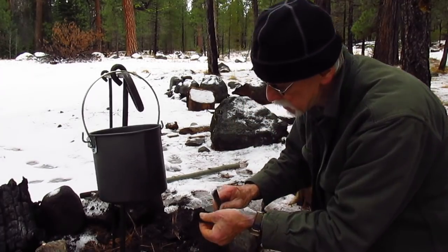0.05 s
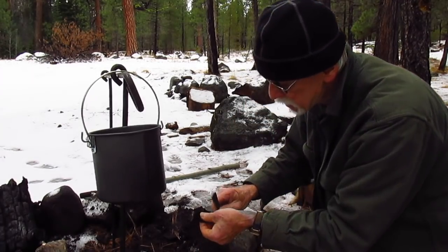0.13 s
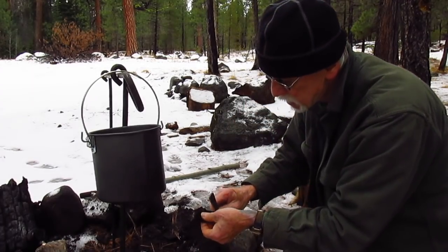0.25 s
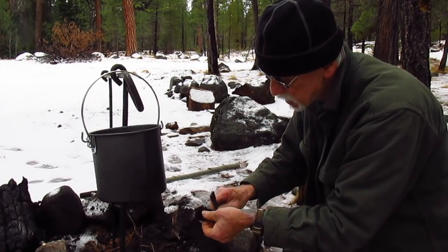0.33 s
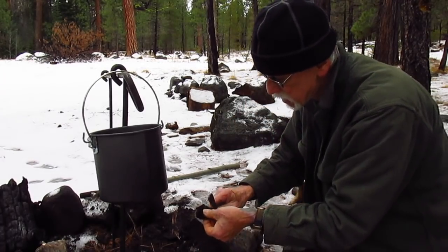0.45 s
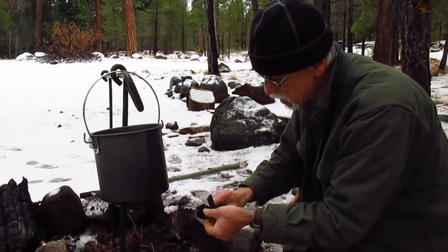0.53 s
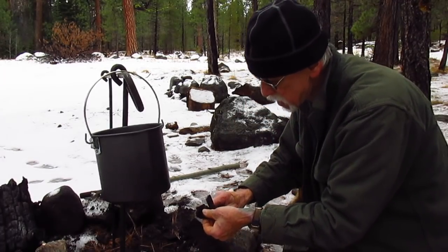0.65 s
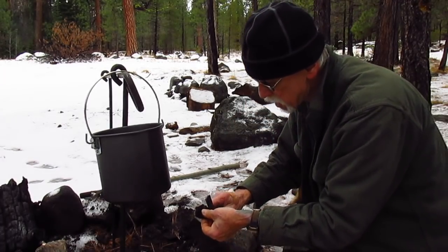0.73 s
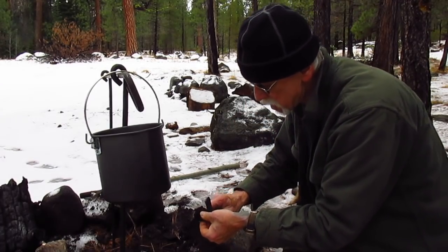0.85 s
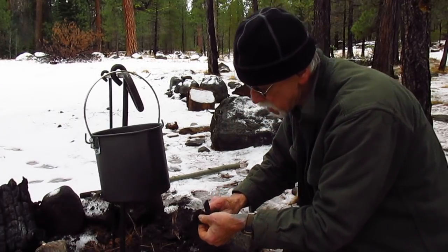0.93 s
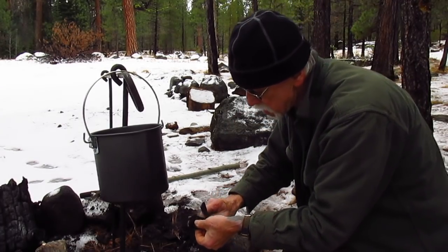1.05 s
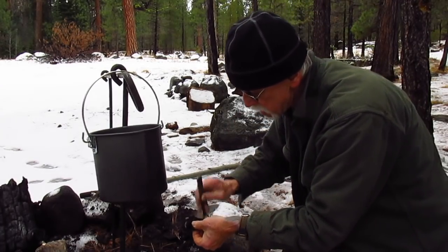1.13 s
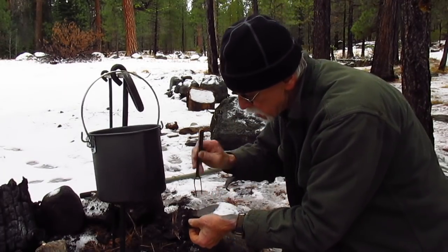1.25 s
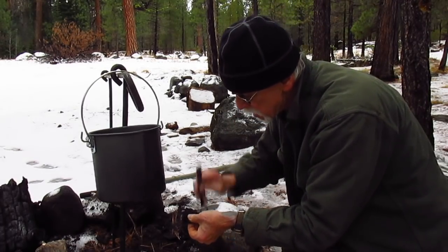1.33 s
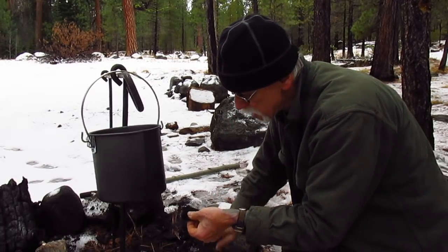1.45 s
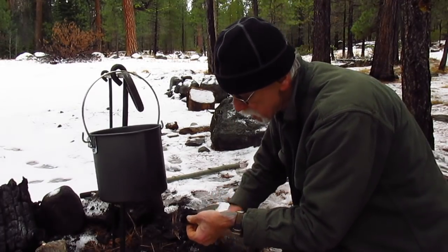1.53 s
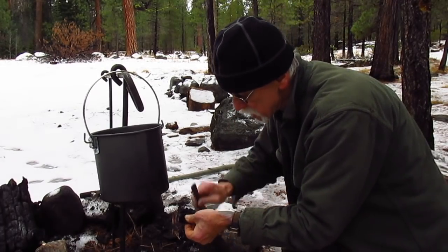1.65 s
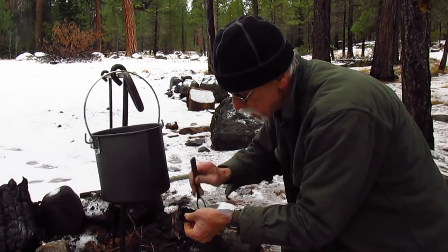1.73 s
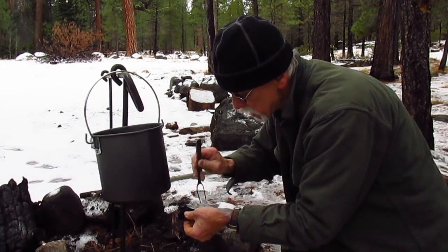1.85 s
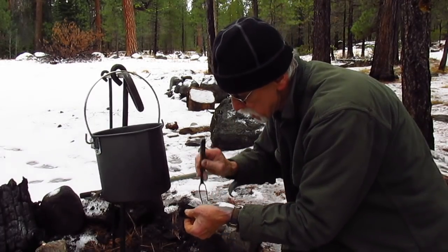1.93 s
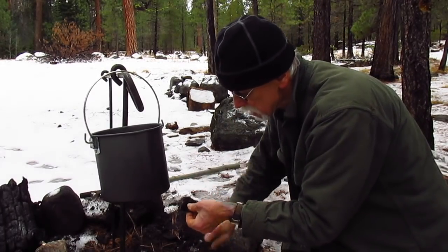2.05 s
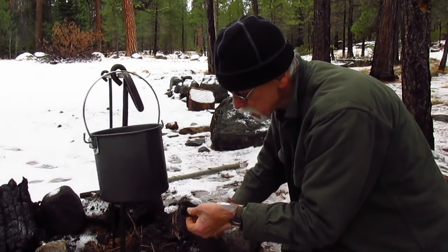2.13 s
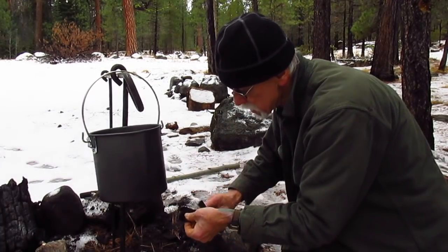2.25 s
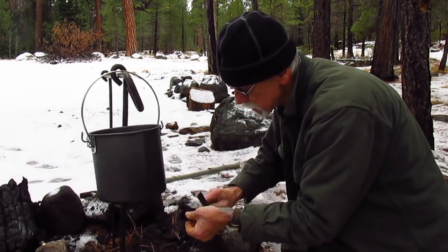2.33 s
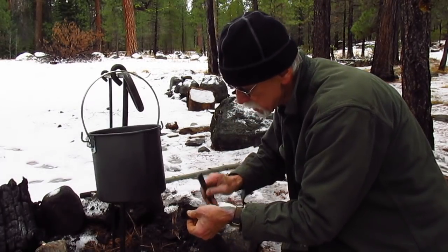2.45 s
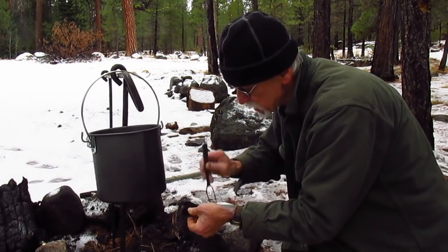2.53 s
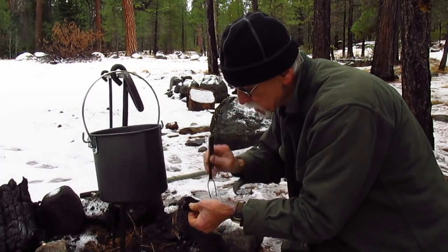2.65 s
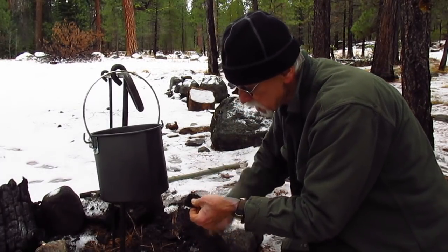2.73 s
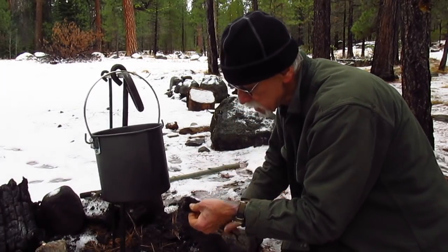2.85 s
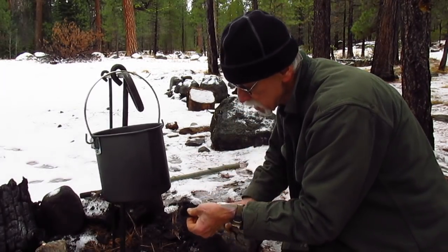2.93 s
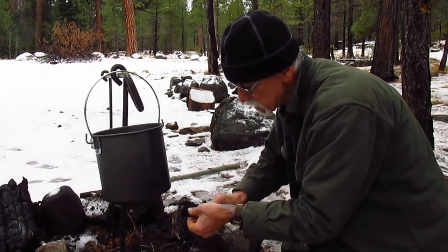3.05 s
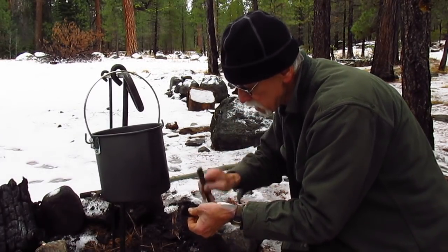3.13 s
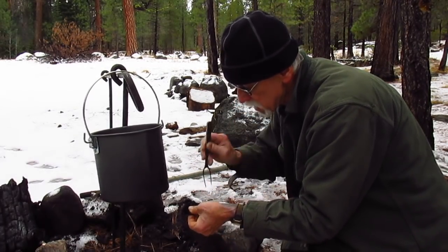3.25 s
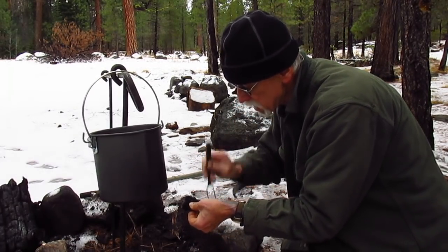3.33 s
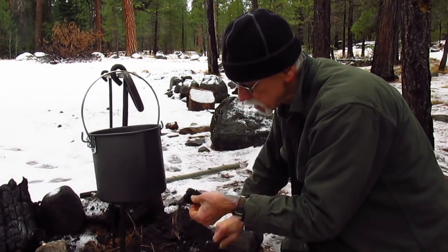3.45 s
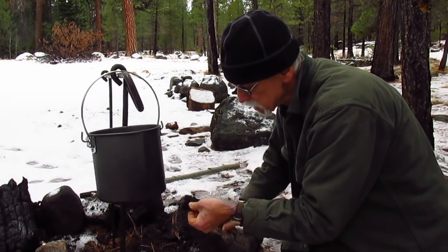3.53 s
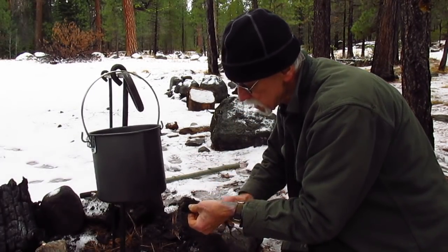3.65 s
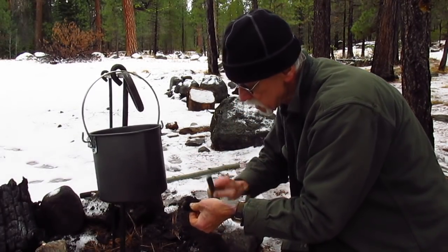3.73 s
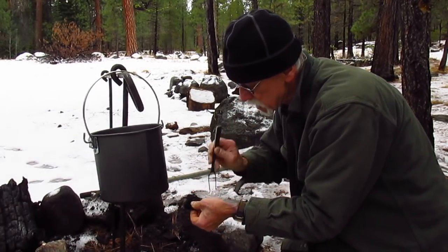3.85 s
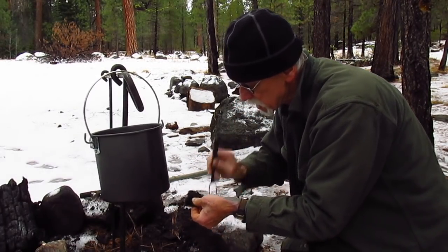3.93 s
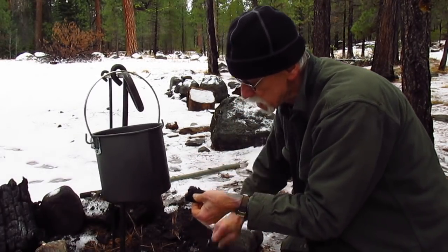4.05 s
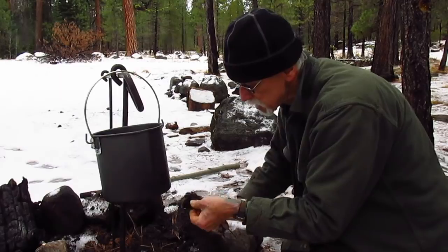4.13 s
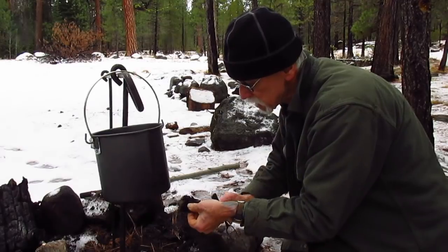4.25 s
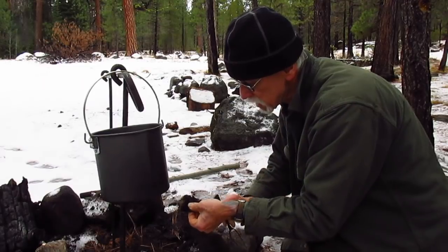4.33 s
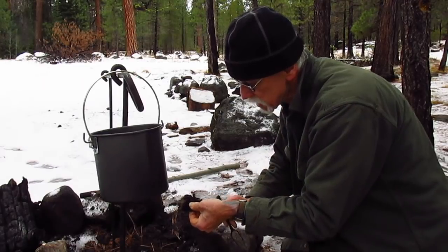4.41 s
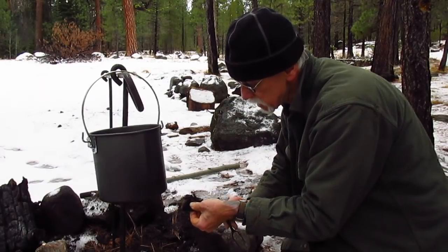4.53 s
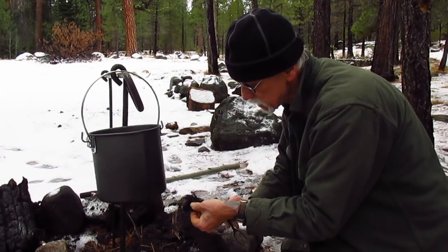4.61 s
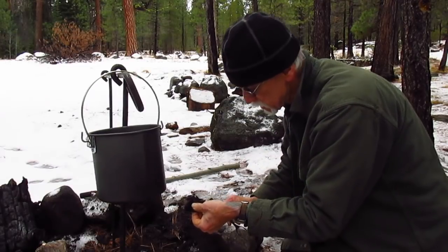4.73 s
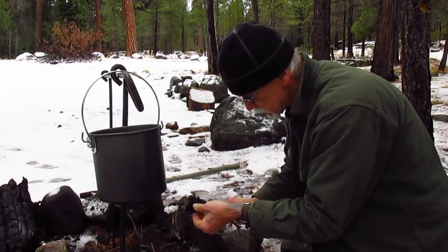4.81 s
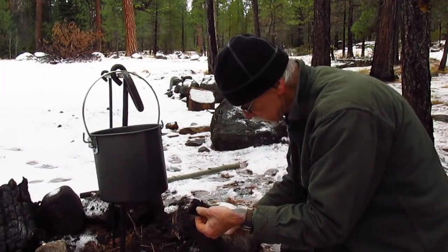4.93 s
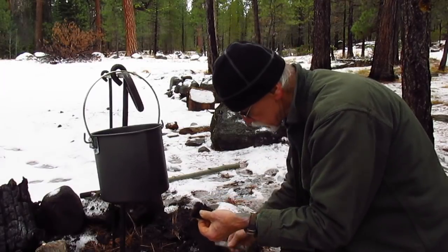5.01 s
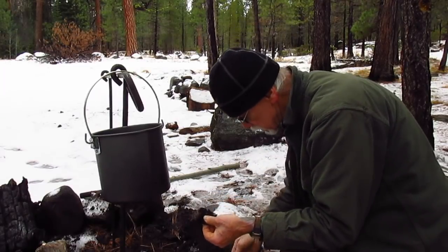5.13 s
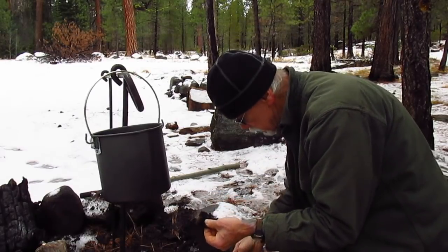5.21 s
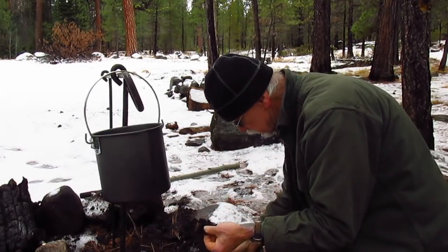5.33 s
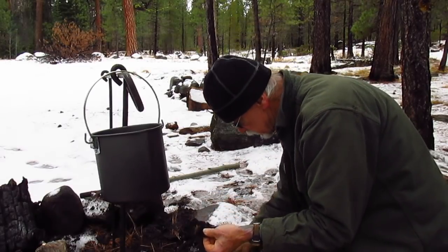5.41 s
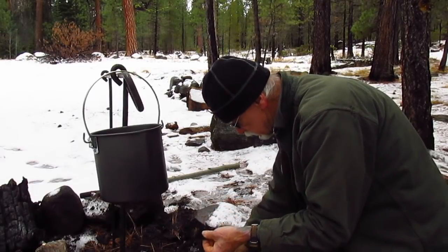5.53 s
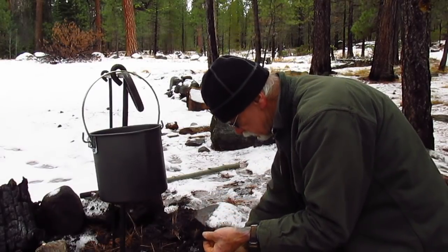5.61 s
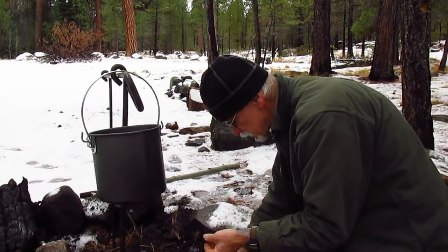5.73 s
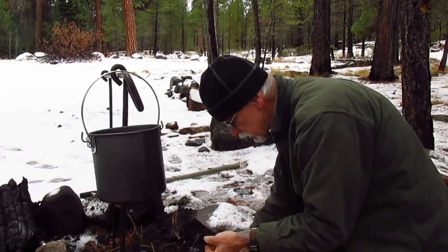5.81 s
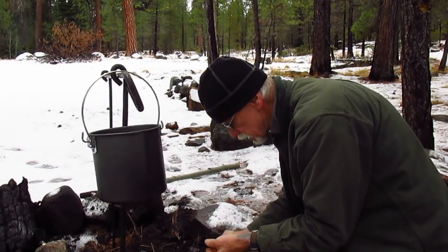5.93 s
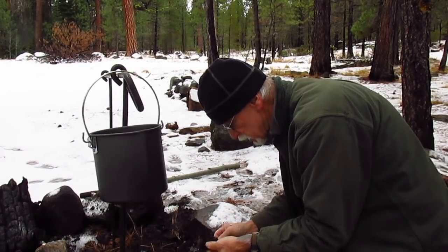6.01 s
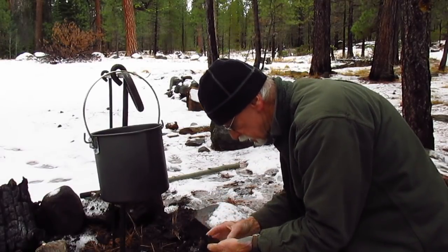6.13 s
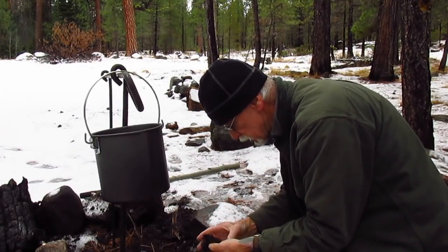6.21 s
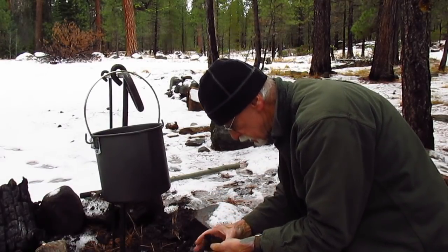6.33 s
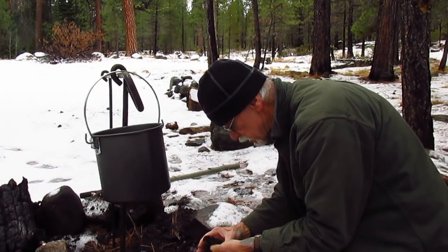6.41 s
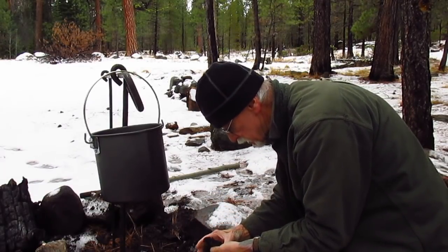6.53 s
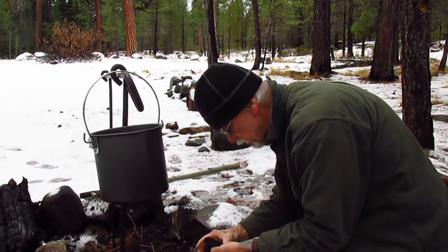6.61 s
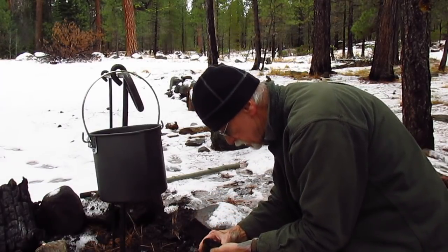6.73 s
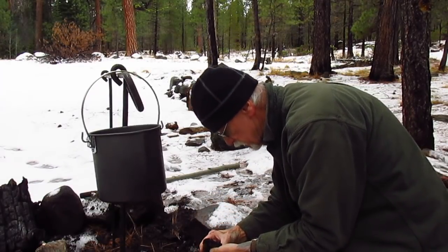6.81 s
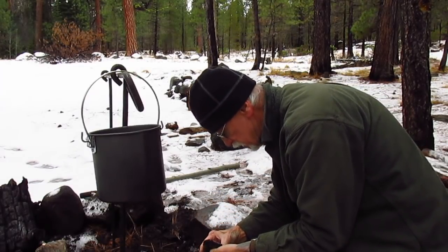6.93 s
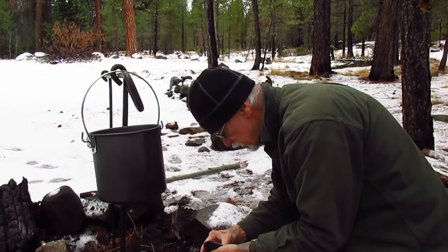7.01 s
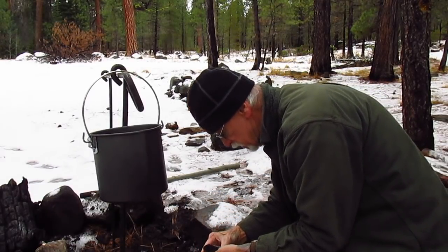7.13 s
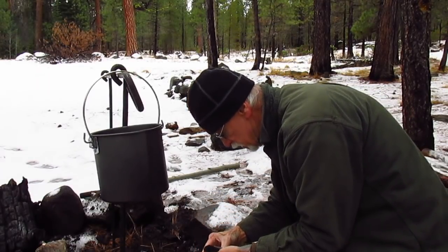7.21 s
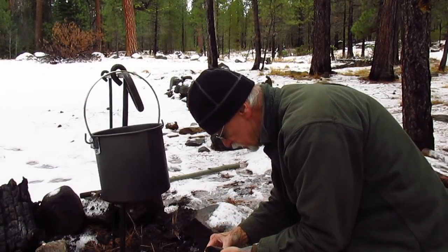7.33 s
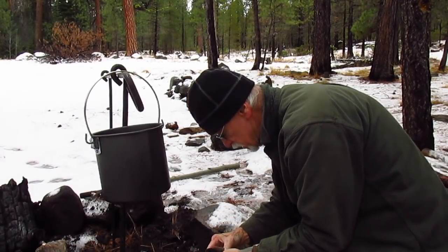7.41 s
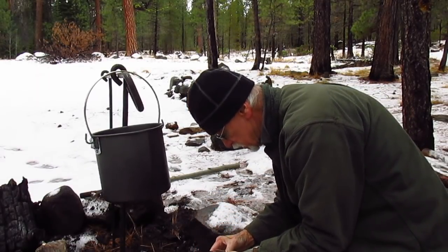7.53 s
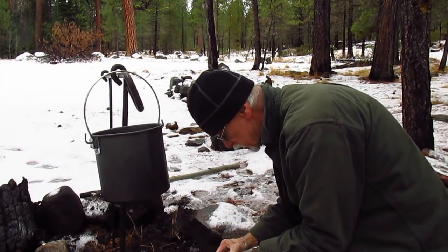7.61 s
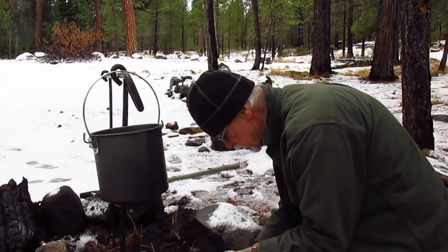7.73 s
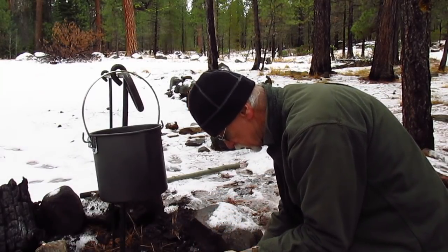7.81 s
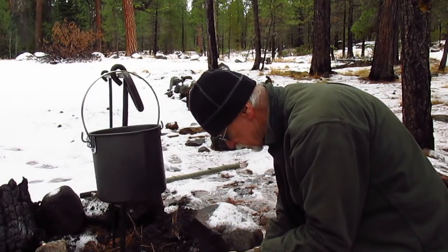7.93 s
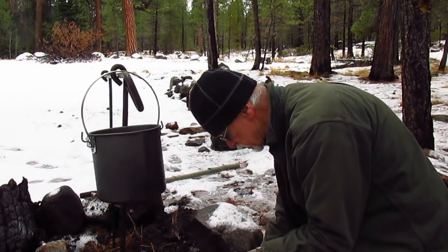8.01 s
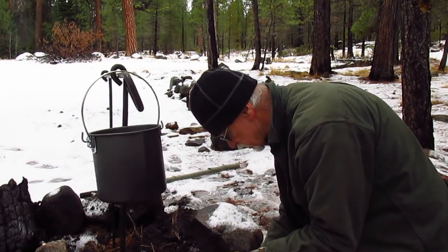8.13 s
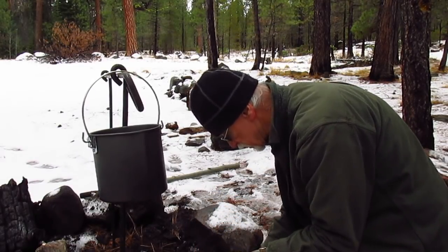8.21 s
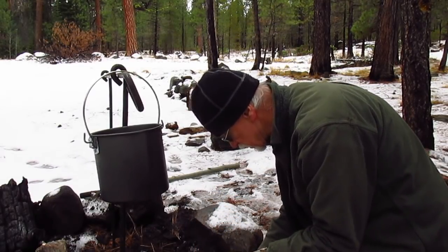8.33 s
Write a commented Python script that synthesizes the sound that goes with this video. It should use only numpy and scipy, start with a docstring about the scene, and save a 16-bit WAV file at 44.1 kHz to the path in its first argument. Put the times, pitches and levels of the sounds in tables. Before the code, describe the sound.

Five piercing, dry clinks of steel on flint dominate, each a hard crack with a short high ring and a light scattered reply from the trees. Light touches and gritty ticks precede them. Far off, a jay rasps repeatedly; wind is barely there. Later a soft wooden clunk, a pause, more distant calls and a quick thin metal rattle at the end. Close outdoor stereo microphones, loud peaks clipped, background briefly ducked.

```python
"""Wind washes through pines in a snowy wood, a far jay scolds and grit ticks near a pair of small microphones.
Close by, a steel striker brushes and hits flint; later it is laid on wood and a tin rattles.
Wind is banded noise and the jay is pulses through throat bands; grit is short noise bursts.
Steel, flint, wood and tin are decaying modes driven by clicks and scrapes, and trees scatter the sound back.
The recorder's gain control ducks loud peaks and slowly recovers; what still exceeds its range clips."""
import sys
import numpy as np
from scipy import signal
from scipy.fft import rfft, irfft
from scipy.io import wavfile

SR = 44100
rng = np.random.default_rng(int(sys.argv[2]) if len(sys.argv) > 2 else 0)


def file_out(sig):
    """Save sig as 16-bit WAV at sys.argv[1]."""
    # one column per channel
    cols = np.atleast_2d(sig).T
    # limit, then scale
    lim = np.clip(cols, -1, 1)
    pcm = np.round(lim * 32767).astype(np.int16)
    wavfile.write(sys.argv[1], SR, pcm)


N = 369072

# Wind in the pines, its tone before levelling. Each row: frequency in Hz, relative level in dB per Hz.
WIND_SPECTRUM = [(15, -40), (25, -12.5), (80, -5), (180, -10), (301, -6.5), (476, -1), (591, -1),
                 (695, -2.5), (1330, -3.5), (3620, -22), (9570, -26), (14000, -27.5), (16000, -36)]
# How alike the wind is at both microphones. Each row: frequency in Hz, shared part of the power from 0 to 1.
WIND_LIKENESS = [(30, 0.76), (120, 0.25), (300, 0.8), (1000, 0.46), (2500, 0.48), (5000, 0.061),
                 (15000, 0.069)]
# The wind swells and sinks. Each row: time in seconds, level in dB.
GUSTS = [(0, -48.5), (.3, -49.5), (1.4, -50.5), (3, -45.5), (4.5, -52), (6, -51.5), (7, -48.5), (8.37, -49)]
# Calls of the far jay. Each row: start in seconds, level of its pulses in dB.
JAY_CALLS = [(0, -33), (.44, -35), (.872, -35), (1.46, -34), (1.88, -31.5), (2.403, -31), (2.914, -30.5),
             (3.381, -33.5), (4.063, -38), (7.026, -33), (7.389, -37), (7.817, -39)]
# Resonances of the jay's throat. Each row: centre in Hz, width in Hz, level in dB.
JAY_THROAT = [(3315, 990, 2.5), (4040, 1300, 0), (5600, 1300, -5)]
# Grit and ash tick and rustle. Each row: peak time in seconds, level in dB,
# rise and fall time constant in seconds, lowest frequency in Hz.
GRIT_TICKS = [(0.035, -41.5, 0.0023, 500), (0.092, -55, .1, 6000), (.131, -50, 0.095, 4170),
              (0.188, -39, 0.015, 4650), (.191, -30.5, 0.0021, 6040), (0.214, -40, .0045, 7000),
              (.31, -59, 0.15, 5000), (1.495, -32, 0.0026, 5920), (1.647, -38, .002, 10000),
              (2.958, -37, 0.0017, 7000), (7.31, -53.5, .015, 9000), (8.067, -48.5, .013, 2500)]
# The striker is laid down on wood. Each row: start in seconds, level in dB, contact cut-off in Hz,
# contact t60 in seconds, lower limit of the body in Hz.
KNOCKS = [(5.673, -57.5, 4000, 0.049, 300), (5.700, -62, 6000, .009, 1500), (5.7115, -42, 2280, 0.029, 400),
          (5.7312, -42, 2610, 0.03, 352), (5.742, -41, 3000, 0.033, 1300), (5.756, -53, 9900, .15, 1990)]
# Modes of the wood. Each row: frequency in Hz, level in dB, t60 in seconds.
WOOD_MODES = [(400, -9, .015), (630, -4, .11), (850, -9, .03), (1150, -11, .015), (1475, -5, .03),
              (2060, -9, .02), (2800, -8, .015), (3600, -12, .015)]
# The tin rattles. Each row: start in seconds, level in dB.
TIN_HITS = [(8.1128, -25.5), (8.117, -20.5), (8.127, -19), (8.134, -24), (8.142, -19.5), (8.148, -31),
            (8.165, -35.5), (8.180, -34), (8.202, -37), (8.232, -43)]
# Modes of the tin's walls. Each row: frequency in Hz, level in dB, t60 in seconds.
TIN_MODES = [(874, -6.5, 0.025), (1560, -20, 0.0088), (2122, 3, 0.024), (2360, -5, .02), (2713, -22, 0.048),
             (2720, -20, 0.054), (2876, -4, 0.077), (3130, 2.5, 0.025), (3280, -1.5, 0.034),
             (3410, 4, 0.024), (4540, -3, 0.014), (6720, -16, 0.032), (7560, -31, .071), (8400, -14, 0.066)]
# Steel meets flint, three light touches and five blows. Each row: start in seconds, blow level in dB,
# scrape length in seconds, lead of the left microphone in samples, crack level in dB,
# lower limit of the body in Hz, stone level in dB, ring of the loosely gripped steel in dB.
STRIKES = [(.578, -49, 0.0033, .6, 5, 2200, 4, 0), (0.659, -58, 0.042, 0.86, -15, 1900, -8, 0),
           (1.007, -56, 0.03, 1, -15, 2500, -20, 0), (1.4402, 7.5, 0.004, 1.31, -9.5, 20, -16, 2),
           (2.0790, 9, 0.0043, 1.17, 2.5, 2270, -31, 3), (2.7910, 5.5, 0.0094, 0.69, 9, 2300, -10, -11),
           (3.4535, 12, 0.002, 1.25, -15.5, 1310, -20.5, -8), (4.0507, 5, 0.0058, 0.34, 7.5, 1400, -24, -1)]
# Clink of the gripped striker. Each row: frequency in Hz, level in dB, t60 in seconds.
CLINK_MODES = [(10350, 1, .01), (8700, -12, .016), (9600, -7, .004), (13000, -32, .08), (14880, -38, .07)]
# Modes of the flint. Each row: frequency in Hz, level in dB, t60 in seconds.
STONE_MODES = [(2050, -7, .014), (3500, 0, .008), (4570, -21, .04), (6300, -16, .02)]
# Steel that rings on and flutters as it swings in the fingers. Each row: frequency in Hz, level in dB,
# t60 in seconds, flutter cut-off in Hz, share that holds still, share of the grip's dB.
STEEL_AFTER_RING = [(3820, -46, .3, 12, .6, 0), (8700, -40, .34, 120, .35, 1), (10350, -38, .3, 200, .3, 0)]

# In every *_PAN_DB, left over right is given in dB: negative lies to the right.
FAR_LAG = 8   # samples by which the right microphone hears far sounds late
PUFF_S, PUFF_DB, PUFF_HZ = 0.99, -48, 68   # a puff of air on the microphones: peak time, level, cut-off
TREES_T60_S, TREES_DB, TREES_GAP_S = .2, -29, 0.0094   # the wash fades in over the gap
JAY_S, JAY_HZ = .25, 890   # length of a call and its pitch at the start
JAY_FALL, JAY_ROUGH = 0.33, 0.072   # pitch fall and rms jitter, as shares of the starting pitch
GRIT_PAN_DB = -8.5
WOOD_RING_DB, WOOD_SCRATCH_DB, WOOD_PAN_DB = -12, 3.5, -6.5
KNOCK_STEEL_DB, KNOCK_STEEL_T60_S = 8, .06   # the steel sings faintly as it lands
TIN_RING_DB, TIN_SCRATCH_DB, TIN_SCRATCH_HZ, TIN_PAN_DB = -25, 7.5, 1630, -8.5
# From the third hit on, each rattle's t60 grows by this many s per s as the tin settles.
TIN_CONTACT_HZ, TIN_RATTLE_S, TIN_RATTLE_GROWS = 9000, 0.066, 1.9
TIN_STILL_S = 8.258   # a hand begins to damp it
SCRAPE_DB, LIGHT_SCRAPE_GAIN = -23.5, .17   # scrape against its blow; dB gained per dB of lighter blow
CRACK_HIGH_HZ, CRACK_SCRAPE = 9000, 0.18   # top of the crack; gain of the scrape in it
CRACK_PAN_DB, CLINK_PAN_DB, AFTER_PAN_DB = -9, 0, -8
DUCK_ABOVE_DB, DUCK_ATTACK_S, DUCK_RELEASE_S = -1, 0.0019, 0.83
CUTOFF_HZ = 16850   # the recorder passes next to nothing above this


def from_db(db):
    """Turns dB into an amplitude factor."""
    return 10 ** (np.asarray(db) / 20)


def rms_one(x):
    """Scales a sound to an rms of 1 over all its channels."""
    return x / np.sqrt(np.mean(x ** 2) + 1e-30)


def at_hz(points, hz):
    """Reads a curve at hz, straight over log frequency."""
    table_hz, values = np.array(points).T
    return np.interp(np.log(hz), np.log(table_hz), values)


def pan(db):
    """Left and right gains that differ by db."""
    return from_db([[db / 2], [-db / 2]])


def add(out, s, sound):
    """Mixes a sound in at time s."""
    i = round(s * SR)
    out[..., i:i + sound.shape[-1]] += sound[..., :N - i]


def butter(x, hz, kind):
    """Second-order Butterworth design, kept inside the usable band."""
    sos = signal.butter(2, np.clip(hz, 10, .45 * SR), kind, fs=SR, output="sos")
    return signal.sosfilt(sos, x)


def ring(force, modes):
    """Each mode is a damped resonator; a unit click sets it ringing at its own height."""
    out = 0
    for hz, level_db, t60 in modes:
        r = from_db(-60 / (t60 * SR))   # decay per sample
        w = 2 * np.pi * hz / SR
        height = from_db(level_db) * np.sin(w)
        # the tiny offset keeps the filter's tail from sinking into very small numbers
        out = out + signal.lfilter([0, height], [1, -2 * r * np.cos(w), r * r], force + 1e-18)
    return out


def drift(rate):
    """Slow random motion of rms 1: noise through two equal poles at rate Hz, one value per 40 samples."""
    r = np.exp(-80 * np.pi * rate / SR)
    noise = rng.standard_normal(N // 40 + 2002)
    slow = signal.lfilter([1], [1, -2 * r, r * r], noise)[2000:]   # drops the filter's start
    return np.interp(np.arange(N) / 40, np.arange(len(slow)), rms_one(slow))


def grains(size, spread_db):
    """Dense clicks of uneven size and random sign; rms 1."""
    heights = from_db(spread_db * np.minimum(rng.exponential(1, size), 5))
    return rms_one(heights * rng.choice([-1, 1], size))


def showers(touches, spread_db):
    """Each touch is one firm contact and a dying shower of small ones, duller where the cut-off is low."""
    force, t = np.zeros(N), np.arange(SR // 4) / SR
    for s, level_db, contact_hz, t60 in touches:
        contacts = grains(len(t), spread_db)
        contacts[0] = 5.76   # the firm contact
        shower = butter(contacts, contact_hz, "low")
        add(force, s, from_db(level_db - 60 * t / t60) * rms_one(shower))
    return force


def wind(patchy_db):
    """Half-octave noise bands: a shared part arriving from the left plus each microphone's own part."""
    out, together = 0, drift(1.5)
    edges = 20 * 2 ** np.arange(0, 10, .5)
    white = rng.standard_normal((2, 3, N))   # neighbouring bands use different noise
    for k, (low, high) in enumerate(zip(edges, edges[1:].tolist() + [19000])):
        shared, *own = butter(white[k % 2], [low, high], "band")
        hz = np.sqrt(low * high)
        alike = np.clip(at_hz(WIND_LIKENESS, hz), 0, 1)
        gain = from_db(at_hz(WIND_SPECTRUM, hz) + patchy_db * (.5 * together + drift(9)))
        from_left = np.array([shared, np.roll(shared, FAR_LAG)])
        out = out + gain * (np.sqrt(alike) * from_left + np.sqrt(1 - alike) * np.array(own))
    t = np.arange(N) / SR
    gusts = from_db(np.interp(t, *np.transpose(GUSTS)))
    puff = rms_one(butter(white[0, :2], PUFF_HZ, "low")) * np.exp(-np.abs(t - PUFF_S) / 0.026)
    return gusts * rms_one(out) + from_db(PUFF_DB) * puff


def trees(x):
    """Trunks and snow scatter the sound back as a dying noise wash, another one at each microphone."""
    t = np.arange(SR // 2) / SR
    fade = from_db(-60 * t / TREES_T60_S) * np.clip(t / TREES_GAP_S, 0, 1)
    wash = rng.standard_normal((2, len(t))) * fade
    wash = wash / np.sqrt(np.sum(wash ** 2, axis=1, keepdims=True))
    return from_db(TREES_DB) * signal.fftconvolve(x, wash, axes=1)[:, :N]


def jay():
    """Jittered pulses on a falling pitch excite the throat's bands; the right microphone hears them late."""
    pulses, along = np.zeros(N), np.linspace(0, 1, round(JAY_S * SR))
    for s, level_db in JAY_CALLS:
        wobble = rms_one(butter(rng.standard_normal(SR // 2), 250, "low"))[:len(along)]
        pitch_hz = JAY_HZ * (1 - JAY_FALL * along + JAY_ROUGH * wobble)
        cycles = np.cumsum(pitch_hz) / SR
        train = np.diff(np.floor(cycles), prepend=0)   # one pulse per cycle
        add(pulses, s, from_db(level_db) * train * np.sin(np.pi * along) ** .6)
    call = 0
    for hz, width, level_db in JAY_THROAT:
        call = call + from_db(level_db) * butter(pulses, [hz - width / 2, hz + width / 2], "band")
    return np.array([call, np.roll(call, FAR_LAG)])


def grit():
    """Band-limited click bursts that swell and die, each microphone getting its own grains."""
    out, half = np.zeros((2, N)), SR // 9
    for s, level_db, length, low_hz in GRIT_TICKS:
        shape = np.exp(-np.abs(np.arange(-half, half) / SR / length))
        burst = butter(grains((2, len(shape)), spread_db=6.5), [low_hz, 13000], "band") * shape
        skip = max(0, half - round(s * SR))   # the part before time zero
        add(out, s - (half - skip) / SR, from_db(level_db) * pan(GRIT_PAN_DB) * burst[:, skip:])
    return out


def knocks():
    """Contacts drive wood and steel modes, with scratch on top; glancing touches miss the low modes."""
    force = 0
    for *touch, low_hz in KNOCKS:
        force = force + butter(showers([touch], spread_db=4.0), low_hz, "high")
    steel = [(hz, level_db, KNOCK_STEEL_T60_S) for hz, level_db, *_ in STEEL_AFTER_RING]
    clunk = from_db(WOOD_RING_DB) * ring(force, WOOD_MODES) + from_db(KNOCK_STEEL_DB) * ring(force, steel)
    scratch = from_db(WOOD_SCRATCH_DB) * butter(force, 1700, "high")
    return pan(WOOD_PAN_DB) * (clunk + scratch)


def tin():
    """Showers of contacts make thin walls ring and scratch until a hand damps them."""
    touches = []
    for s, level_db in TIN_HITS:
        t60 = TIN_RATTLE_S + TIN_RATTLE_GROWS * max(s - TIN_HITS[2][0], 0)
        touches.append((s, level_db, TIN_CONTACT_HZ, t60))
    force = butter(showers(touches, spread_db=4.5), 1030, "high")
    walls = from_db(TIN_RING_DB) * ring(force, TIN_MODES)
    scratch = from_db(TIN_SCRATCH_DB) * butter(force, TIN_SCRATCH_HZ, "high")
    damped = np.clip((np.arange(N) / SR - TIN_STILL_S) / .032, 0, 1)
    return pan(TIN_PAN_DB) * (walls + scratch) * (1 - damped) ** 2


def striker():
    """One click, then the edge scrapes along the stone; both drive steel, flint and a bare crack."""
    out, size = np.zeros((2, N)), SR // 2
    early = 64   # samples of room for the left microphone's lead
    t, turn = np.arange(size) / SR, 2j * np.pi * np.fft.rfftfreq(size)
    click = 1. * (t == 0)
    for s, blow_db, length, lead, crack_db, low_hz, stone_db, grip_db in STRIKES:
        scrape_shape = np.exp(-((t / length - .3) / .75) ** 2)
        scrape_gain = from_db(SCRAPE_DB - LIGHT_SCRAPE_GAIN * blow_db)
        scrape = scrape_gain * grains(size, spread_db=6.0) * scrape_shape
        crack = butter(click + CRACK_SCRAPE * scrape, [low_hz, CRACK_HIGH_HZ], "band")
        # every strike excites the flint's modes a little differently, by some 2 dB
        stone_modes = STONE_MODES + rng.normal(0, 2, (len(STONE_MODES), 1)) * [0, 1, 0]
        stone = ring(click + scrape, stone_modes)
        bare = from_db(crack_db) * crack + from_db(stone_db) * stone
        sound = pan(CLINK_PAN_DB) * ring(click + scrape, CLINK_MODES) + pan(CRACK_PAN_DB) * bare
        sound = butter(butter(sound, low_hz, "high"), low_hz, "high")   # a glancing blow has no body
        sound = np.pad(sound, ((0, 0), (early, 0)))[:, :size]
        sound[0] = irfft(rfft(sound[0]) * np.exp(turn * lead), size)   # left arrives first
        for hz, level_db, t60, swing_hz, steady, gripped in STEEL_AFTER_RING:
            swing = rms_one(butter(rng.standard_normal((2, 2 * size)), swing_hz, "low")[:, size:])
            flutter = steady + (1 - steady) * swing
            tone = np.roll(ring(click, [(hz, level_db + gripped * grip_db, t60)]), early)
            sound = sound + pan(AFTER_PAN_DB) * flutter * tone
        # the last samples hold what the shift wrapped round
        add(out, s - early / SR, from_db(blow_db) * sound[:, :-256])
    return out


def scene():
    """Wind, jay and grit around the near sounds; the trees answer both the near sounds and the jay."""
    far_bird = jay()
    near = knocks() + tin() + striker()
    background = wind(patchy_db=0.72) + far_bird + from_db(28.5) * trees(far_bird)
    return background + grit() + near + trees(near) * pan(-13.5)


def record(dry):
    """Gain control: excess over a threshold is held, dies away, and is taken off after a short attack."""
    t = np.arange(N) / SR
    peak_db = 20 * np.log10(np.abs(dry).max(axis=0) + 1e-9)   # both channels duck together
    excess_db = np.maximum(peak_db - DUCK_ABOVE_DB, 1e-9)
    # the greatest of all past excesses, each decaying exponentially
    held_db = np.exp(np.maximum.accumulate(np.log(excess_db) + t / DUCK_RELEASE_S) - t / DUCK_RELEASE_S)
    r = np.exp(-1 / (DUCK_ATTACK_S * SR))
    ducked = dry * from_db(-signal.lfilter([1 - r], [1, -r], held_db))
    overloaded = np.clip(ducked, -.97, .97)
    cut = signal.cheby2(14, 70, CUTOFF_HZ, fs=SR, output="sos")
    return signal.sosfilt(cut, overloaded)


dry = scene()
out = record(dry)
file_out(out)
```